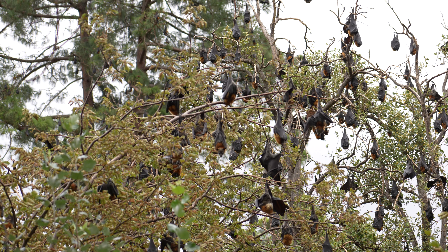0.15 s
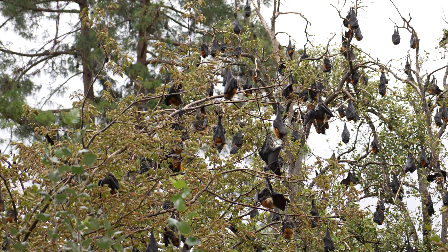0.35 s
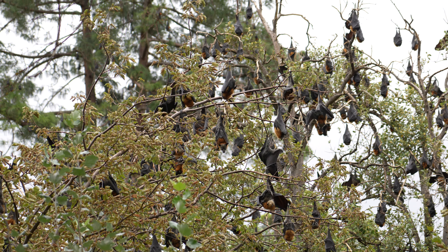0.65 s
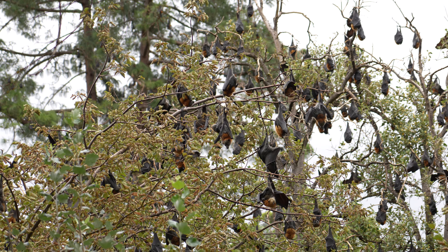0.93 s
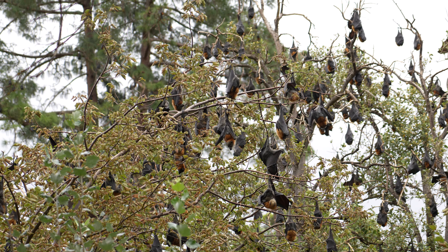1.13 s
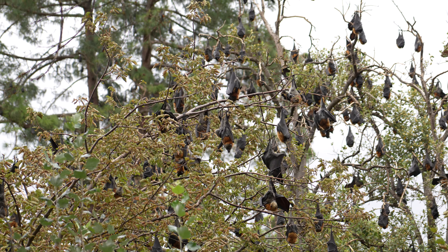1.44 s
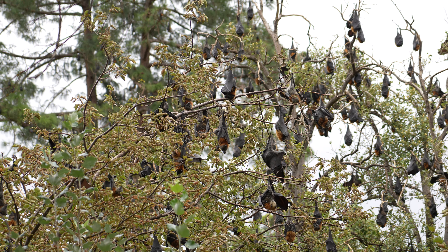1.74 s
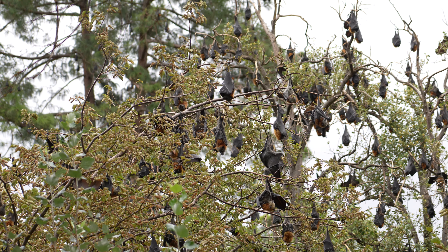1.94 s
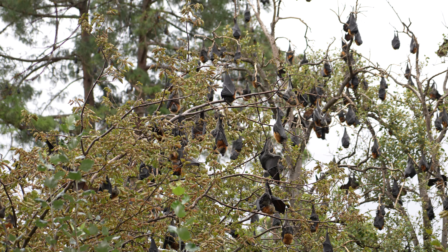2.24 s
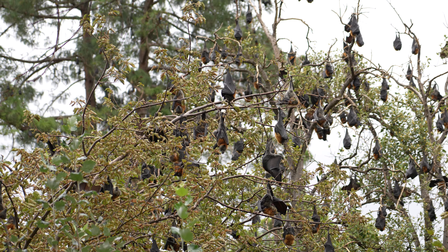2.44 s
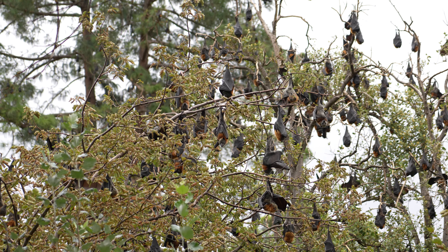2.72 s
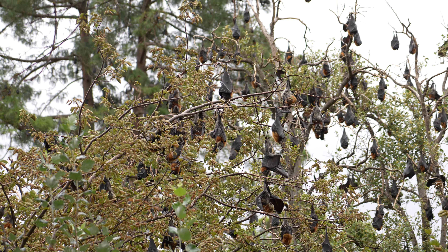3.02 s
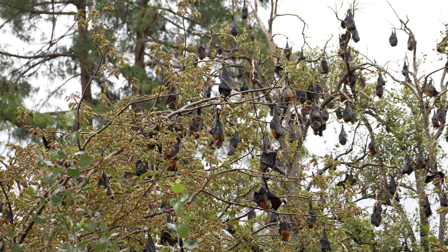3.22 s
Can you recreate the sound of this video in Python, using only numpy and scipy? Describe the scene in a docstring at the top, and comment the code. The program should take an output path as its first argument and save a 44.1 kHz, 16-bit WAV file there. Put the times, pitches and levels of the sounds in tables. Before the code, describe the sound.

Many roosting bats screech and chatter outdoors, some fairly near the microphone, others merging into a hissing distant crowd; tiny twig snaps, a short diffuse echo from the trees and a soft far-off road drone.

```python
"""Fruit bats squabble in the treetops: near voices screech, chitter and trill, and one gives a clear squeal.
Screeches are jittering tones torn by flutter, with overtones and rasp filtered by the throat.
Random far cries sit over a shrill wash of flickering noise; twigs snap with tiny noise clicks.
The trees return a short, diffuse echo as decaying noise.
Underneath lies distant traffic: shaped noise for the tyres, wandering tones for the engines."""
import sys
import numpy as np
from scipy import signal
from scipy.fft import rfft, irfft, next_fast_len
from scipy.io import wavfile

SR = 44100
rng = np.random.default_rng(int(sys.argv[2]) if len(sys.argv) > 2 else 0)


def master(y):
    """Save y as 16-bit WAV."""
    cut = np.clip(np.atleast_2d(y).T, -1, 1)
    pcm = np.round(cut * 32767)  # scale
    wavfile.write(sys.argv[1], SR, pcm.astype(np.int16))


N = 148617
TIME = np.arange(N) / SR  # seconds
CUTOFF_HZ = 15900

# Nearer screeches: start_s, length_s, start_pitch_hz, middle_pitch_hz, end_pitch_hz, flutter_hz,
# flutter_depth (ratio, also phase swing in radians), roughness (0-1), level_db, overtone_drive_db, pan_db (+ left)
NEAR_CRIES = [(0.046, 0.062, 2471, 2577, 2434, 420, 0.6, 0, -27.5, -10, -3.5),
              (.126, 0.051, 2490, 2550, 2480, 420, 0.54, 0.17, -28, -12, 2),
              (0.05, .15, 3360, 3344, 3430, 420, 0.42, 0.14, -37.5, -18, -9.5),
              (0.108, .11, 857, 931, 1010, 300, 0, 0.54, -42.5, -6, 6),
              (.232, 0.096, 1051, 1118, 1055, 295, 0.1, 0.33, -37.5, -6, 1),
              (0.243, 0.083, 2180, 2210, 2056, 355, 0.1, 0.62, -31, -9, -1),
              (.338, 0.079, 2510, 2750, 2450, 433, 0.4, 0.29, -28.5, -2, 0),
              (.405, 0.062, 2510, 2426, 2390, 407, 0.75, 0, -31, -15, -3),
              (.438, 0.17, 2887, 2690, 2646, 700, 0.36, .09, -31.5, -19, -3),
              (.61, .125, 2800, 2830, 2810, 700, 0.1, 0.18, -38, -10, -12),
              (.675, 0.026, 2445, 2500, 2460, 486, 0.3, 0.42, -30, 1, -8),
              (.945, 0.074, 6500, 6300, 6100, 395, 0.2, 0.27, -43, -10, 0),
              (1.135, .025, 2390, 2560, 2520, 490, 0.4, 0.8, -34, -6, 0),
              (1.5, 0.047, 2770, 2800, 2720, 700, 0.42, 0, -38, -12, 5),
              (1.59, 0.032, 8100, 8470, 8600, 600, .2, .25, -42, -10, 2),
              (1.635, 0.052, 8000, 8700, 8850, 595, 0.3, .25, -40, -10, 2),
              (2.363, 0.051, 5000, 4950, 4950, 1273, 0.4, 0.74, -31.5, 14, -5),
              (2.375, 0.03, 3090, 2917, 2880, 1590, 0.17, .65, -20.5, 1.5, 4),
              (2.413, 0.02, 2040, 2270, 2800, 500, 0.2, 0.85, -28, 11, 1),
              (2.424, 0.066, 2660, 2526, 2455, 408, 0.47, 0.06, -26.5, -1, 2),
              (2.43, 0.016, 2970, 2960, 2800, 410, 0.54, 0.63, -22, -19, 4),
              (2.48, .055, 3210, 3160, 3020, 370, 1.1, .45, -29, 8, -2),
              (2.484, 0.046, 3950, 4086, 4100, 366, 0.4, 0.26, -34, -10, 0),
              (2.535, 0.054, 2200, 2230, 1985, 333, .8, 0.44, -29, -0.5, 3),
              (2.612, .024, 2270, 2536, 3320, 500, 0.2, 0.2, -28.5, 5, 1),
              (2.626, 0.039, 2450, 2450, 2280, 1150, 0.54, 0.57, -30, 19, -3),
              (2.864, 0.052, 1875, 1990, 1960, 410, 0.65, 0.4, -34, -5, 4),
              (2.925, 0.04, 1870, 1886, 1880, 360, 0.4, 0.65, -37.5, -6, 2),
              (3.039, 0.12, 2950, 3157, 3344, 526, .7, 0.74, -29.5, -17, -5.5),
              (3.275, 0.065, 5100, 5200, 5160, 500, 0.2, 0.31, -38, -10, 1)]
# Throat filter on overtones and rasp: frequency_hz, gain_db
THROAT_FILTER = [(800, -34), (2000, -15), (3500, -7), (4700, -9), (5600, -20), (7000, -13), (9000, -24.5),
                 (11800, -42), (14000, -26), (16000, -34)]
ATTACK_S, RELEASE_S = 0.0028, 0.01
JITTER, JITTER_HZ = 0.058, 500  # share of the pitch at full roughness; rate of wander
FLUTTER_JITTER = 0.26  # unevenness of the flutter rate at full roughness

# Course of the clear squeal: time_s, pitch_hz, tone_level_db
SQUEAL_COURSE = [(2.657, 1900, -38), (2.667, 2244, -19), (2.676, 2280, -19.5), (2.704, 2256, -25),
                 (2.72, 2225, -20.5), (2.733, 2206, -21.5), (2.742, 2150, -18.5), (2.752, 1926, -37),
                 (2.77, 1900, -40)]
# Squeal partials, from the fundamental upwards: relative_level_db
SQUEAL_PARTIALS = [-3.5, -24, -10.5, -21.5, -54, -23, -30]
SQUEAL_JITTER, SQUEAL_PAN_DB = 0.0059, 2
SQUEAL_RASP_DB, SQUEAL_RASP_FOLLOWS = -34, 0.43  # at the squeal's peak; share of its level swing

# Very short chittering squeaks: start_s, level_db, nominal_lowest_partial_hz
CHITTER_SQUEAKS = [(.254, -47, 8400), (.277, -38, 8600), (.295, -37, 8600), (.334, -35, 9100),
                   (.529, -40, 8700), (.541, -33, 9100), (.558, -30.5, 9170), (.567, -33, 9100),
                   (.577, -31, 9400), (.591, -37, 9500), (.602, -39, 9300), (.616, -37, 9240),
                   (.636, -36, 9400), (.652, -38, 9200), (.667, -39, 10000), (.681, -33, 10060),
                   (.722, -34.5, 9160), (.822, -36, 6140), (.91, -32.5, 4970), (.953, -36.5, 6270),
                   (.989, -27, 5960), (1.027, -28, 6120), (1.052, -24.5, 5750), (1.078, -26, 5750),
                   (1.098, -27.5, 6000), (1.121, -34, 5930), (1.142, -24.5, 5720)]
# Color of the squeak rasp: multiple_of_lowest_partial (ratio), gain_db
SQUEAK_RASP_SHAPE = [(.2, -23), (.42, -1), (.7, -4.5), (1, -0.5), (1.8, -5.5), (2.1, -11), (2.8, -23)]
SQUEAK_S, SQUEAK_FALL_DB, SQUEAK_JITTER = 0.0077, 4, 0.049  # length, loss per partial, pitch scatter
SQUEAK_RASP_DB = -3.5  # against the tone

# Thin, high trills: start_s, length_s, level_db, pitch_hz
HIGH_TRILLS = [(1.825, 0.42, -52.5, 14500), (2.86, 0.43, -50, 14600)]
TRILL_PER_S, TRILL_SWING, TRILL_JITTER = 38.5, 0.025, 0.055  # rate; shares of the pitch
TRILL_PAN_DB = 8

# Snapping twigs: start_s, level_before_decay_db
TWIG_SNAPS = [(1.561, -28.5), (2.241, -30), (2.94, -38)]
# Color of a snap: frequency_hz, gain_db
TWIG_COLOR = [(5000, -29), (9000, -10), (12000, 7), (16000, -15)]
SNAP_S = 0.0011  # decay time constant

# Swell of the far colony, before the layer trims: time_s, screech_level_db, hiss_level_db
COLONY_SWELL = [(.06, -30.5, -40.5), (.28, -32, -39), (.38, -32, -38), (.62, -30, -39), (.8, -30.5, -41),
                (.95, -34.5, -42.5), (1.24, -32.5, -40.5), (1.45, -33.5, -40), (1.7, -37, -40.5),
                (1.8, -30, -35.5), (2.05, -31, -40.5), (2.25, -31, -35), (2.32, -32.5, -45.5),
                (2.5, -26, -38), (2.68, -31, -37), (2.83, -33.5, -35), (3.09, -31, -36), (3.36, -29, -31.5)]
# Color of the screeching wash: frequency_hz, relative_level_db
WASH_COLOR = [(1000, -35), (1700, -14), (2250, -5), (2800, 0), (3300, -1), (3900, -15.5), (5000, -40),
              (9000, -64)]
# Color of the hissing treble: frequency_hz, relative_level_db
HISS_COLOR = [(2500, -23), (4000, -1), (5200, 1.5), (6300, 0), (7500, -3), (9000, -8.5), (11000, -15),
              (13000, -22), (16000, -51)]
WASH_TRIM_DB, HISS_TRIM_DB, FAR_CRIES_TRIM_DB = -0.5, 2, -3.5
WASH_FLICKER_DB, HISS_FLICKER_DB = 1.5, 1.5
FAR_CRIES_PER_S, FAR_PITCH_HZ, FAR_FLUTTER_HZ = 30, 2880, 420  # pitch and flutter are centers of a random range
FAR_DEPTH, FAR_ROUGH, FAR_OVERTONES_DB = 0.52, 0.18, 2

# Color of the traffic noise: frequency_hz, relative_level_db (per Hz)
TRAFFIC_COLOR = [(20, -16), (38, -11), (52, -3.5), (68, -3.5), (85, -6.5), (150, -3.5), (205, -0.5),
                 (270, -4.5), (330, -6), (550, -8.5), (1050, -7), (1600, -12), (2500, -13), (6000, -52),
                 (16000, -25)]
TRAFFIC_DB, TRAFFIC_FLICKER_DB = -35.5, 1.16
# Engine drone tones: pitch_hz, level_before_swell_db, wander_width_hz
ENGINE_TONES = [(99.5, -53.5, 4.6), (184.9, -45.5, 6.2), (212.3, -40.5, 9.5), (240.4, -48, 4.4),
                (275, -51.5, 4.5), (292.7, -53.5, 3.1)]
# Rise and fall of the engine drone: time_s, gain_db
ENGINE_SWELL = [(0, 2.5), (.5, -4.5), (1.1, -0.5), (1.5, -2), (1.8, 3), (2.2, 1), (2.5, 4.5), (2.75, -3),
                (3.37, -1.5)]
# Deep exhaust note: time_s, level_db
EXHAUST_LEVEL = [(0, -58), (.85, -46.5), (1.6, -53.5), (2.3, -53), (2.95, -44), (3.37, -44.5)]
EXHAUST_HZ, EXHAUST_WIDTH_HZ = 63, 8.5

# Stereo image of the noise layers: frequency_hz, left_right_likeness (ratio), left_minus_right_db
STEREO_IMAGE = [(60, .999, 0), (180, .997, -0.2), (350, .95, 0.7), (700, 0.83, 3.5), (1390, 0.6, 1.3),
                (2800, 0.024, -2.3), (5560, 0.04, -2.5), (11000, 0.11, 1), (15000, 0.029, -1)]
TREES_T60_S, TREES_DB = 0.2, -5
SPREAD_S = 0.00006  # largest time shift of each channel
START_S, FADE_S = 0.035, 0.025


def near_cries():
    """Screeches of the nearer bats, each with its own pitch glide and flutter."""
    out = np.zeros((2, N))
    for start, length, first, middle, last, flutter_hz, depth, rough, db, overtones_db, pan_db in NEAR_CRIES:
        voice = cry(length, (first, middle, last), flutter_hz, depth, rough, overtones_db)
        add(out, from_db(db) * voice, start, pan_db)
    return out


def cry(length, pitches, flutter_hz, depth, rough, overtones_db, size=8192):
    """A shrill, jittering tone torn into sidebands by flutter; overtones and rasp pass through the throat."""
    t = TIME[:min(int(length * SR), size)]
    jitter = drift(JITTER_HZ, size)[:len(t)]
    uneven = drift(JITTER_HZ, size)[:len(t)]
    glide = np.polyval(np.polyfit([0, 0.5, 1], pitches, 2), t / t[-1])
    # the flutter rate follows the pitch
    flutter_rate = flutter_hz * glide / pitches[1] * (1 + FLUTTER_JITTER * rough * uneven)
    flutter = sweep(flutter_rate)
    phase = sweep(glide * (1 + JITTER * rough * jitter)) + depth * np.sin(flutter - 1)
    envelope = np.minimum(t / ATTACK_S, 1) * np.minimum((t[-1] - t) / RELEASE_S, 1)
    envelope = envelope * (1 + depth * np.cos(flutter))
    overtones = sum(np.sin(k * phase) for k in range(2, int(CUTOFF_HZ / pitches[1]) + 1))
    rasp = rough * rng.standard_normal(len(t))
    throat = shape(envelope * (overtones + rasp), THROAT_FILTER)
    return rms_one(envelope * np.sin(phase) + from_db(overtones_db) * throat)


def squeal():
    """One voice breaks into a sagging whistle with a strong third partial and a little rasp."""
    out = np.zeros((2, N))
    pitch, db = in_time(SQUEAL_COURSE)
    phase = sweep(pitch * (1 + SQUEAL_JITTER * drift(444)))
    tone = sum(from_db(level) * np.sin((k + 1) * phase) for k, level in enumerate(SQUEAL_PARTIALS))
    # the rasp pulses once per cycle
    rasp = rms_one(shape((1 + np.cos(phase)) * rng.standard_normal(N), THROAT_FILTER))
    rasp_db = SQUEAL_RASP_DB + SQUEAL_RASP_FOLLOWS * (db - db.max())
    voice = rms_one(tone) * from_db(db) + rasp * from_db(rasp_db)
    sounding = (TIME > SQUEAL_COURSE[0][0]) & (TIME < SQUEAL_COURSE[-1][0])
    add(out, voice * sounding, 0, SQUEAL_PAN_DB)
    return out


def chitter():
    """Runs of tiny arched squeaks, heard from their fourth partial upwards, each with a puff of rasp."""
    out = np.zeros((2, N))
    u = np.linspace(0, 1, int(SQUEAK_S * SR))
    arch = np.sin(np.pi * u)
    for start, db, hz in CHITTER_SQUEAKS:
        jitter = SQUEAK_JITTER * drift(830, size=2048)[:len(u)]
        phase = sweep(hz / 4 * (0.94 + 0.07 * arch + jitter))
        partials = [k for k in range(4, 12) if k * hz / 4 < CUTOFF_HZ]
        tone = sum(from_db(-SQUEAK_FALL_DB * k) * np.sin(k * phase) for k in partials)
        rasp_color = [(multiple * hz, level) for multiple, level in SQUEAK_RASP_SHAPE]
        rasp = shape(rng.standard_normal(2048), rasp_color)[:len(u)]
        voice = rms_one(tone) + from_db(SQUEAK_RASP_DB) * rms_one(rasp)
        add(out, from_db(db) * rms_one(voice * np.sqrt(arch) * (1 - u / 2)), start)
    return out


def trills():
    """Thin voices that throb and swing in pitch at one rate."""
    out = np.zeros((2, N))
    for start, length, db, hz in HIGH_TRILLS:
        t = np.arange(int(length * SR)) / SR
        beat = 2 * np.pi * TRILL_PER_S * t
        pitch = hz * (1 + TRILL_SWING * np.sin(beat) + TRILL_JITTER * drift(2000, len(t)))
        throb = 1.3 + np.cos(beat)
        envelope = np.sqrt(np.sin(np.pi * t / length))
        add(out, from_db(db) * rms_one(np.sin(sweep(pitch)) * throb * envelope), start, TRILL_PAN_DB)
    return out


def twigs():
    """Tiny dry snaps among the branches: treble noise that dies away exponentially."""
    out = np.zeros((2, N))
    t = TIME[:512]
    for start, db in TWIG_SNAPS:
        crack = rms_one(shape(rng.standard_normal(len(t)), TWIG_COLOR))
        add(out, from_db(db) * crack * np.exp(-t / SNAP_S), start)
    return out


def trees(x):
    """Diffuse scatter from trunks and leaves: a decaying noise tail, different on each side."""
    t = TIME[:SR // 2]
    tail = rng.standard_normal((2, len(t))) * from_db(-60 * t / TREES_T60_S) * (t > 0.004)
    tail = tail / np.sqrt(np.sum(tail ** 2) / 2)
    return signal.fftconvolve(x, tail, axes=1)[:, :N]


def colony():
    """Far cries at random, over the wash into which the farthest voices merge."""
    screech_db, hiss_db = in_time(COLONY_SWELL)
    wash = from_db(screech_db + WASH_TRIM_DB) * air_noise(WASH_COLOR, WASH_FLICKER_DB)
    hiss = from_db(hiss_db + HISS_TRIM_DB) * air_noise(HISS_COLOR, HISS_FLICKER_DB)
    crowd = np.zeros((2, N))
    draws = rng.uniform(-1, 1, (int(FAR_CRIES_PER_S * N / SR), 6))
    for when, length, pitch, glide, flutter, pan in draws:
        bend = np.array([1 - 0.0482 * glide, 1.02, 1 + 0.047 * glide])
        pitches = FAR_PITCH_HZ * (1 + 0.16 * pitch) * bend
        flutter_hz = FAR_FLUTTER_HZ * 2 ** (0.5 * flutter)
        voice = cry(0.055 * 2 ** length, pitches, flutter_hz, FAR_DEPTH, FAR_ROUGH, FAR_OVERTONES_DB)
        add(crowd, voice, (when + 1) / 2 * N / SR, 5 * pan - 1)
    far_cries = from_db(screech_db + FAR_CRIES_TRIM_DB) * rms_one(crowd + trees(crowd))
    return wash + hiss + far_cries


def traffic():
    """Tyre roar as shaped noise, with the wavering drone and deep exhaust note of far engines."""
    swell_db, = in_time(ENGINE_SWELL)
    exhaust_db, = in_time(EXHAUST_LEVEL)
    drone = sum(from_db(db + swell_db) * waver(hz, width) for hz, db, width in ENGINE_TONES)
    exhaust = from_db(exhaust_db) * waver(EXHAUST_HZ, EXHAUST_WIDTH_HZ)
    roar = from_db(TRAFFIC_DB) * air_noise(TRAFFIC_COLOR, TRAFFIC_FLICKER_DB)
    return drone + exhaust + roar


def waver(hz, width_hz):
    """A tone that wanders in level and pitch, its two quadratures drifting apart."""
    wander = drift(width_hz) + 1j * drift(width_hz)
    return np.real(wander * np.exp(2j * np.pi * hz * TIME))


def air_noise(spectrum, flicker_db):
    """Diffuse stereo noise; half-octave bands flicker on their own, with all the low end as one band."""
    size = next_fast_len(N)
    hz = np.fft.rfftfreq(size, 1 / SR)
    alike = np.clip(at_hz(STEREO_IMAGE, hz), -1, 1)
    pan_db = at_hz(STEREO_IMAGE, hz, axis=2)
    mid, side = rfft(rng.standard_normal((2, size)))
    sign = np.array([[1], [-1]])  # left, right
    field = np.sqrt(1 + alike) * mid + sign * np.sqrt(1 - alike) * side
    field = field * from_db(at_hz(spectrum, hz) + sign * pan_db / 2)
    band = np.floor(2 * np.log2(np.clip(hz, 1000, 15000)))
    knots = np.arange(0, 3.5, 0.012)  # seconds
    out = np.zeros((2, N))
    for k in np.unique(band):
        flicker = np.interp(TIME, knots, rng.standard_normal(len(knots)))
        out += irfft(field * (band == k), size)[:, :N] * from_db(flicker_db * flicker)
    return rms_one(out)


def add(out, x, start, pan_db=0):
    """Place a sound in stereo by a level difference and a small random time difference."""
    lag = SPREAD_S * rng.uniform(-1, 1)
    for channel, side in enumerate((1, -1)):
        i = max(0, int((start + side * lag) * SR))
        part = out[channel, i:i + len(x)]
        part += x[:len(part)] * from_db(side * pan_db / 2)


def shape(x, spectrum):
    """Filter a sound by a spectrum table."""
    size = x.shape[-1]
    padded = 2 * next_fast_len(size)
    hz = np.linspace(0, SR / 2, padded // 2 + 1)
    return irfft(rfft(x, padded) * from_db(at_hz(spectrum, hz)))[..., :size]


def drift(rate, size=N):
    """Smooth random wander of spread 1: noise through two equal one-pole lowpass filters."""
    pole = np.exp(-2 * np.pi * rate / SR)
    padded = 2 * next_fast_len(size)
    delay = np.exp(-1j * np.linspace(0, np.pi, padded // 2 + 1))
    noise = rfft(rng.standard_normal(padded))
    return rms_one(irfft(noise / (1 - pole * delay) ** 2)[:size])


def sweep(hz):
    """Running phase in radians of a changing frequency."""
    return 2 * np.pi * np.cumsum(hz) / SR


def from_db(db):
    """Decibels to gain."""
    return 10 ** (np.asarray(db) / 20)


def rms_one(x):
    """Scale to unit power."""
    return x / np.sqrt(np.mean(x ** 2) + 1e-20)


def in_time(rows):
    """Each column of a curve at every sample."""
    s, *columns = np.transpose(rows)
    return [np.interp(TIME, s, c) for c in columns]


def at_hz(points, hz, axis=1):
    """Read a column of a spectrum table on a log-frequency axis."""
    table = np.array(points)
    return np.interp(np.log(np.maximum(hz, 1)), np.log(table[:, 0]), table[:, axis])


def scene():
    """Near bats and twigs with their echo, the far colony and the road."""
    near = near_cries() + squeal() + chitter() + trills() + twigs()
    echo = from_db(TREES_DB) * trees(near)
    return near + echo + colony() + traffic()


def record(dry):
    """A brief silence, a quick fade-in and a steep top cut."""
    faded = dry * np.clip((TIME - START_S) / FADE_S, 0, 1)
    top_cut = signal.ellip(12, 0.1, 80, CUTOFF_HZ, fs=SR, output="sos")
    return signal.sosfilt(top_cut, faded)


dry = scene()
out = record(dry)
master(out)
```